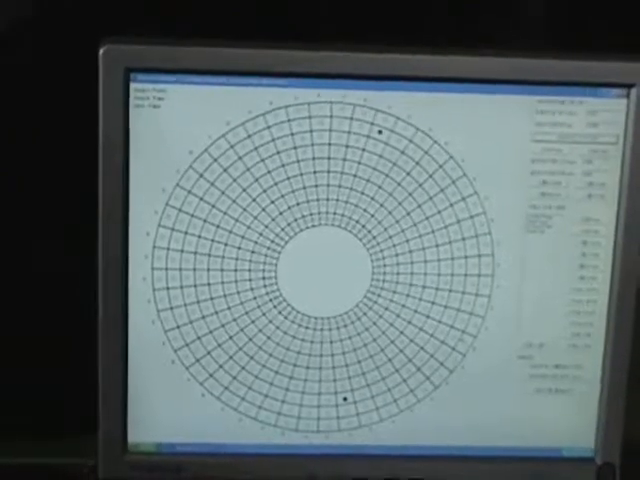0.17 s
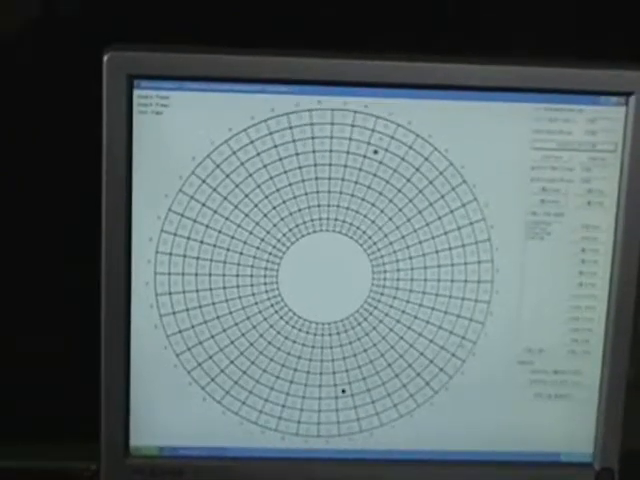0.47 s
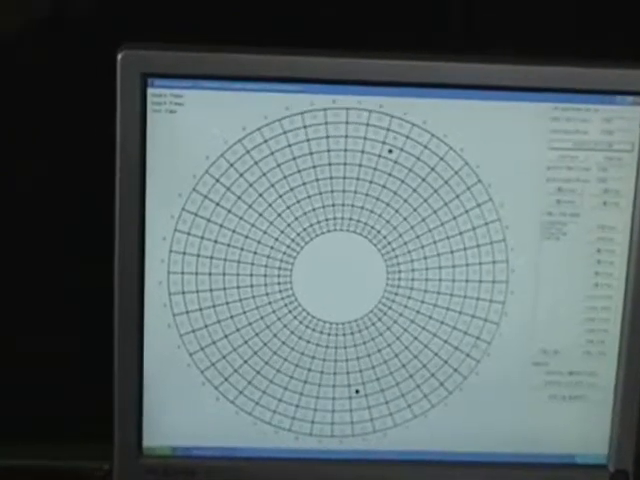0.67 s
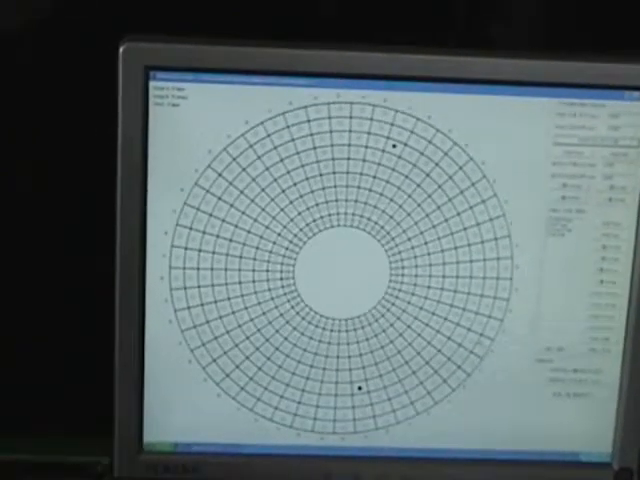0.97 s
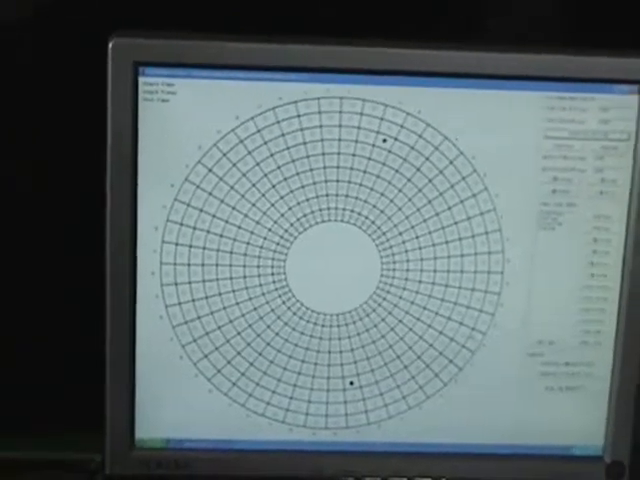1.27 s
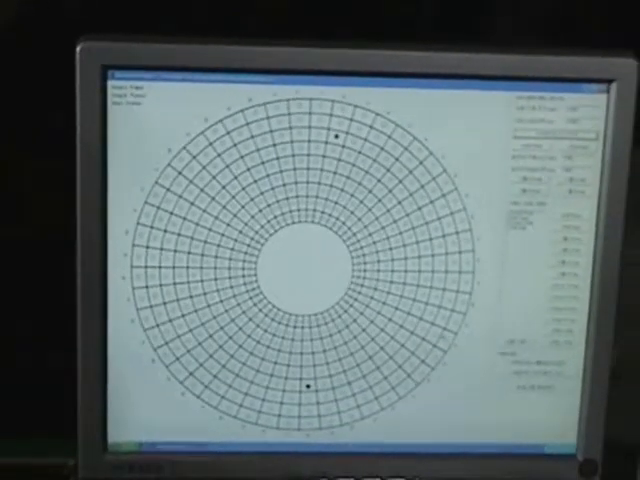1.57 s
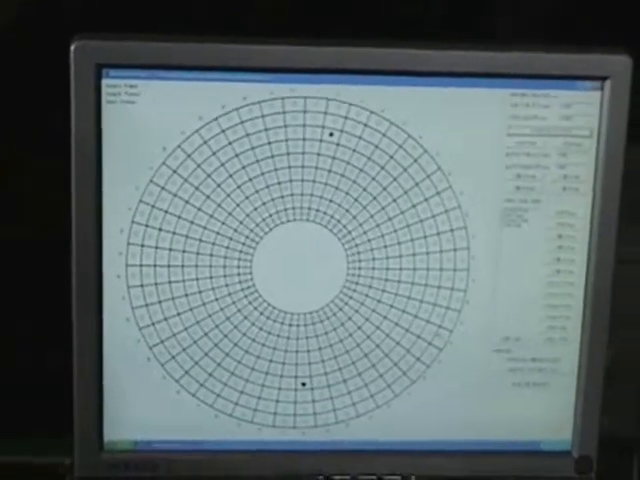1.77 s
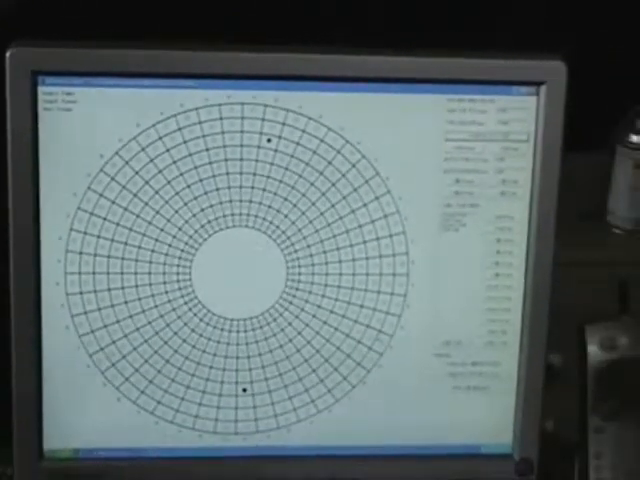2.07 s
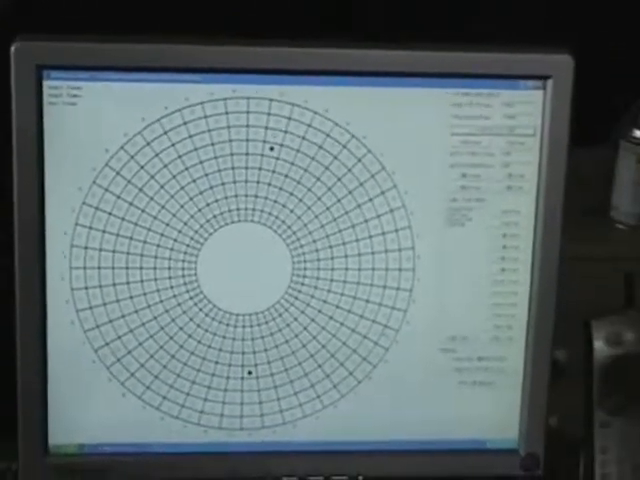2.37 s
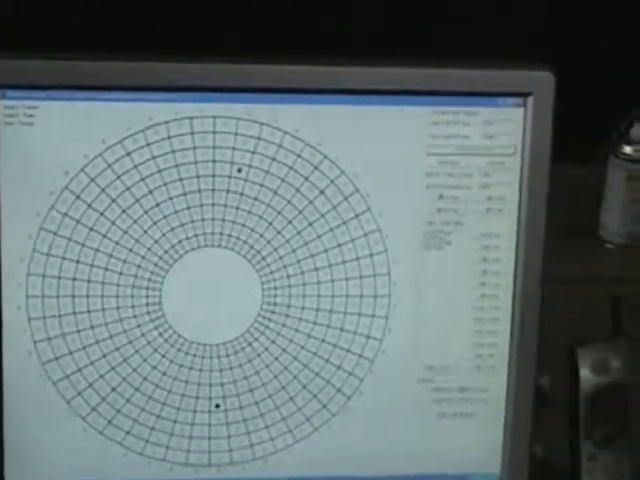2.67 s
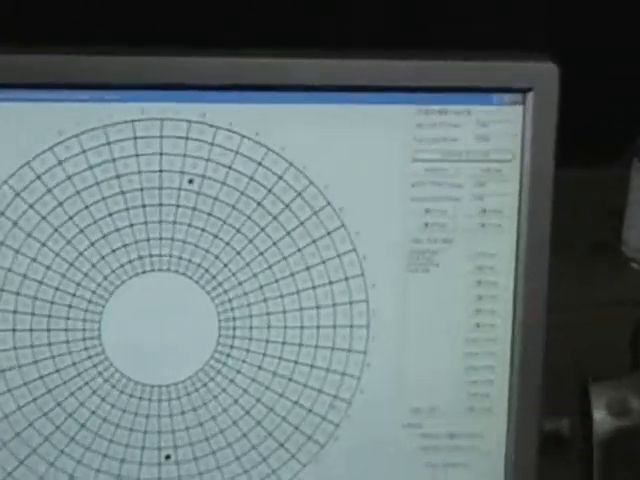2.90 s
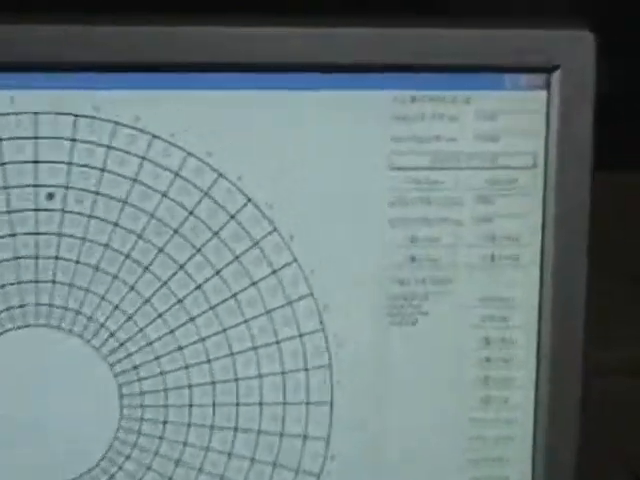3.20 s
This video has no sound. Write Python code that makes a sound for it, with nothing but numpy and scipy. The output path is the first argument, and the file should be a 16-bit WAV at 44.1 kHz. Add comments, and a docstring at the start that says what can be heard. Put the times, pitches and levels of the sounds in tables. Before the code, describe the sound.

Pneumatic machine in an indoor workshop: air bursts with dull valve thumps recur over a steady motor drone and whine, small metal clinks and rubbing slides between them; close stereo pickup, drone ducking under each burst.

```python
"""A pneumatic braiding machine in a workshop: a motor drones and whines and air leaks all the way through.
It starts inside a burst of air (filtered noise) with a valve thump (short, low decaying tones).
Thin whistles (narrow noise) come and go; at 0.6 s a part clinks (click and ringing tones), then slides (noise).
At 1.6 s comes the next burst with two thumps, at 2.3 s two clinks and a slide, at 3.3 s a thump and burst.
A fast gain control pushes the drone down under every burst."""
import sys
import numpy as np
from scipy import signal
from scipy.fft import rfft, irfft
from scipy.io import wavfile
from scipy.ndimage import uniform_filter1d

SR = 44100
rng = np.random.default_rng(int(sys.argv[2]) if len(sys.argv) > 2 else 0)


def unload_wav(signal):
    """Save mono or channel-first audio to the path in sys.argv[1] as 16-bit WAV at rate SR, clipped to [-1, 1]."""
    wavfile.write(
        sys.argv[1],
        SR,
        np.round(np.clip(np.atleast_2d(signal).T, -1, 1) * 32767).astype(np.int16),
    )


N = 147294


def amp(db):
    """Turn decibels into a plain gain."""
    return 10 ** (np.asarray(db) / 20)


def unit(x):
    """Scale a signal to an average (RMS) size of one."""
    return x / np.sqrt(np.mean(x ** 2) + 1e-20)


def read(points, hz):
    """Read a curve between its points, along a logarithmic pitch scale."""
    f, value = np.transpose(points)
    return np.interp(np.log(hz + 1), np.log(f + 1), value)


def clock():
    """Time of every sample in seconds."""
    return np.arange(N) / SR


def wander(rate_hz):
    """Smooth random motion of unit size; a higher rate moves faster."""
    f = np.fft.rfftfreq(N, 1 / SR)
    smooth = rfft(rng.standard_normal(N)) * np.exp(-(f / rate_hz) ** 2)
    return unit(irfft(smooth, N))


# How much louder the left channel is than the right: pitch_hz, difference_db
LEFT_LEAN = [(40, -2), (150, 3.5), (600, 3.5), (1300, 3.5), (2800, .4), (15000, 0)]


def lean(hz):
    """Left and right gains at a frequency."""
    difference_db = read(LEFT_LEAN, hz)
    return amp(np.array([difference_db, -difference_db]) / 2)


# How alike the two channels are: pitch_hz, likeness (0 to 1, anything above counts as 1)
LIKENESS = [(40, 1.5), (130, 0.6), (600, 1), (1400, 1), (3100, 0.77), (6000, 0.56), (15000, 0.63)]
COMB_DB = 1.3  # size of the fixed fine colour above 2000 Hz, as from nearby reflections


def noise(spectrum, patch_db, peaks=()):
    """Stereo noise of unit size with a spectrum, resonances and small drifting patches."""
    frames, hz = N // 256 + 5, np.fft.rfftfreq(1024, 1 / SR)
    a, b, c, d, patches = rng.standard_normal((5, frames, len(hz)))
    patches = uniform_filter1d(patches, size=7, axis=0)  # smooth over time
    patches = unit(uniform_filter1d(patches, size=16, axis=1))  # smooth over pitch

    same = np.clip(read(LIKENESS, hz), 0, 1)
    left = a + 1j * b
    right = same * left + np.sqrt(1 - same ** 2) * (c + 1j * d)
    z = np.array([left, right]) * lean(hz)[:, None]

    comb = uniform_filter1d(rng.standard_normal((2, 1, len(hz))), size=2)
    comb = COMB_DB * unit(comb) * (hz > 2000)
    lift = sum(db / (1 + ((hz - f) / width) ** 2) for f, width, db in peaks)
    z = z * amp(read(spectrum, hz) + lift + comb + patch_db * patches)
    sound = signal.istft(z.swapaxes(-1, -2), nperseg=1024, noverlap=768)[1]
    return unit(sound[:, :N])


def strike(start, t60, rise_s=0.00043):
    """Envelope of a blow: quick rise, exponential decay by 60 dB in t60 seconds."""
    age = np.maximum(clock() - start, 0)
    return np.minimum(age / rise_s, 1) * np.exp(-np.log(1000) * age / t60)


# Colour of the steady air leak: pitch_hz, relative_level_db
LEAK_COLOUR = [(50, -43), (300, -28), (1500, -8), (3000, 0), (4500, -1.5), (6300, -2), (8200, 1),
               (9700, -2), (11200, -0.5), (13300, -4.5), (16000, -7)]
# Broad resonances of the leak: pitch_hz, half_width_hz, lift_db
LEAK_RESONANCES = [(5300, 500, 1), (11050, 300, 1.5), (14300, 280, 7)]
# Thin air whistles: start_s, end_s, pitch_hz, level_db
AIR_WHISTLES = [(.1, 1.58, 8160, -55.5), (.78, 1.28, 5330, -59.5), (2.05, 3.26, 8150, -55),
                (2.34, 2.98, 5405, -55)]
LEAK_DB, LEAK_PATCH_DB = -40, 1.0
SPIT_S, SPIT_DB, SPIT_T60_S = 2.963, -43, .05  # one tiny spit of air
WHISTLE_FADE_S, WHISTLE_WANDER_HZ, WHISTLE_WAVER_DB = .06, 60, 1


def leak():
    """Escaping air makes steady noise; narrow noise around one pitch makes each breathy whistle."""
    t = clock()
    level = amp(LEAK_DB) + amp(SPIT_DB) * strike(SPIT_S, SPIT_T60_S)
    out = level * noise(LEAK_COLOUR, LEAK_PATCH_DB, LEAK_RESONANCES)
    for start, end, hz, db in AIR_WHISTLES:
        gate = np.clip(np.minimum(t - start, end - t) / WHISTLE_FADE_S, 0, 1)
        angle = 2 * np.pi * hz * t
        # two random strengths blur the pure tone into a narrow band of breath
        breath = wander(WHISTLE_WANDER_HZ) * np.sin(angle) + wander(WHISTLE_WANDER_HZ) * np.cos(angle)
        out += amp(db + WHISTLE_WAVER_DB * wander(7.4)) * gate * breath
    return out


# Strong partials of the motor: multiple_of_shaft_speed, level_db
STRONG_PARTIALS = [(6, -72), (10, -68.5), (11, -60.5), (12, -65.5), (16, -60), (17, -64.5), (18, -57.5),
                   (19, -53), (22, -54.5), (23, -58), (24, -53.5), (25, -67), (29, -51.5), (31, -57),
                   (36, -56.5), (37, -59), (39, -59), (41, -52.5), (46, -56), (48, -57.5), (51, -52.5),
                   (52, -58.5), (62, -60), (71, -58.5), (72, -55), (76, -61), (77, -56), (80, -46),
                   (82, -57), (84, -51), (85, -53), (86, -61), (99, -61), (108, -61)]
# Typical level of the weaker partials between them: pitch_hz, level_db
WEAK_PARTIALS = [(60, -88), (120, -77), (150, -84), (240, -76), (420, -72), (600, -64.5), (900, -66.5),
                 (1400, -60.5), (1750, -77.5), (2300, -72.5), (2800, -69), (3250, -82), (3850, -68),
                 (4200, -92)]
# Colour of the mechanical rush: pitch_hz, relative_level_db
RUSH_COLOUR = [(25, -38), (58, -38), (90, -28), (150, -19.5), (220, -14.5), (310, -20.5), (450, -8.5),
               (570, 1), (680, 2.5), (800, -2), (950, -7.5), (1090, -3.5), (1280, -3.5), (1520, -8),
               (1800, -9.5), (2500, -4.5), (4000, -35), (16000, -53)]
MOTOR_HZ, MOTOR_DRIFT = 30.42, .0004  # shaft turns per second, drift as a share of that
PARTIAL_SCATTER_DB, PARTIAL_WAVER_DB = 2, 1.6
PARTIAL_SPREAD = 0.27  # phase difference between the channels, radians per kHz
# below this pitch the partials nearly line up into one knock a turn (scatter in radians)
KNOCK_TOP_HZ, KNOCK_LOOSE_RAD = 500, 0.83
RUSH_DB, RUSH_THROB_DB, RUSH_PATCH_DB = -42, 1, 2.04


def motor():
    """A turning shaft gives a comb of partials, with a soft knock and a throb of the rush once a turn."""
    angle = 2 * np.pi * np.cumsum(MOTOR_HZ * (1 + MOTOR_DRIFT * wander(3.0))) / SR
    strong = {round(k): db for k, db in STRONG_PARTIALS}
    waver = wander(3.8)
    out = np.zeros((2, N))
    for k in range(3, 132):
        hz = k * MOTOR_HZ
        scatter, spread, loose = rng.standard_normal(3)
        phase = loose * (KNOCK_LOOSE_RAD if hz < KNOCK_TOP_HZ else np.pi)
        weak_db = read(WEAK_PARTIALS, hz) + PARTIAL_SCATTER_DB * np.tanh(scatter)
        db = strong.get(k, weak_db)
        offset = np.array([[0], [PARTIAL_SPREAD * spread * hz / 1000]])
        own_waver = np.roll(waver, rng.integers(N))  # each partial wavers at its own time
        size = np.sqrt(2) * amp(db + PARTIAL_WAVER_DB * own_waver)
        out += lean(hz)[:, None] * size * np.sin(k * angle + phase + offset)
    rush_level = amp(RUSH_DB + RUSH_THROB_DB * np.cos(angle))
    return out + rush_level * noise(RUSH_COLOUR, RUSH_PATCH_DB)


# The whine gently rises and falls, before its quick waver: time_s, level_db
WHINE_LEVELS = [(0, -42), (.45, -43.5), (.7, -42), (1.5, -42), (2.05, -43), (2.35, -42), (3.3, -41.5)]
WHINE_HZ, WHINE_DRIFT = 1054, 0.00075  # drift as a share of the pitch
WHINE_WAVER_DB, WHINE_FLUTTER_RAD = 1.13, 0.085


def whine():
    """The drive gives one strong tone whose pitch and level flutter slightly."""
    angle = 2 * np.pi * np.cumsum(WHINE_HZ * (1 + WHINE_DRIFT * wander(12.0))) / SR
    level_db = np.interp(clock(), *np.transpose(WHINE_LEVELS)) + WHINE_WAVER_DB * wander(34)
    tone = np.sin(angle + WHINE_FLUTTER_RAD * wander(47)) * amp(level_db)
    return np.sqrt(2) * lean(WHINE_HZ)[:, None] * tone


# Times when a part slides after a clink: start_s, end_s, level_db of the rubbing
SLIDE_TIMES = [(0.624, 1.33, -43), (2.29, 3.002, -44.5)]
# Colour of the rubbing: pitch_hz, relative_level_db
SLIDE_COLOUR = [(60, -28), (400, -10), (700, 3), (900, -4), (1120, -1.5), (1450, -6), (1800, -12),
                (3200, -4), (4500, -16.5), (14000, -15.5)]
SLIDE_FADE_S, SLIDE_PATCH_DB = 0.0087, -0.5
SING_HZ, SING_DB, SING_WAVER_HZ = 1084, -2, 14  # tone of the part; its level is against the rubbing


def slides():
    """A travelling part rubs with soft, grainy noise; it sings faintly and beats against the whine."""
    t = clock()
    level = sum(amp(db) * np.clip(np.minimum(t - start, end - t) / SLIDE_FADE_S, 0, 1)
                for start, end, db in SLIDE_TIMES)
    tone = np.sin(2 * np.pi * SING_HZ * t + wander(SING_WAVER_HZ))
    sing = lean(SING_HZ)[:, None] * amp(SING_DB) * tone
    return level * (noise(SLIDE_COLOUR, SLIDE_PATCH_DB) + sing)


# Metal clinks: start_s, base_level_db, click_pitch_hz, click_overtone_db
CLINK_EVENTS = [(.597, -37, 3120, -14), (2.2753, -37, 2870, -10), (2.339, -49, 2750, -12)]
# Ringing tones of the part: pitch_hz, level_db against the base, t60_s
CLINK_TONES = [(2800, -6, .14), (3020, -2, .17), (3230, -3, .2), (3520, -10, .16), (4540, -11, .1),
               (5850, -11, .09)]
# Colour of the grit in the click: pitch_hz, relative_level_db
CLICK_COLOUR = [(500, -33), (2000, -5), (3000, 0), (4500, -1), (5900, -6), (7500, -10), (16000, -24)]
CLICK_DB, CLICK_S, GRIT_DB = 9.5, .002, -5  # click against the base, time constant, grit in the click


def clinks():
    """A small steel part scrapes home with a sharp click, then rings briefly in several decaying tones."""
    t = clock()
    grit = noise(CLICK_COLOUR, 0)
    out = np.zeros((2, N))
    for start, db, click_hz, overtone_db in CLINK_EVENTS:
        angle = 2 * np.pi * click_hz * (t - start)
        click = np.cos(angle) + amp(overtone_db) * np.cos(2 * angle) + amp(GRIT_DB) * grit
        # the click swells into its start time and fades just as fast
        out += amp(db + CLICK_DB) * np.exp(-abs(t - start) / CLICK_S) * click
        for hz, tone_db, t60 in CLINK_TONES:
            phase = rng.uniform(0, 2 * np.pi) + .5 * rng.standard_normal((2, 1)) + 0.68 * wander(90)
            out += amp(db + tone_db) * strike(start, t60) * np.sin(2 * np.pi * hz * t + phase)
    return out


# Valve thumps: start_s, base_level_db
THUMP_EVENTS = [(0.031, -31), (1.588, -35), (1.712, -36), (3.2659, -35)]
# Tones of the machine body that they shake: pitch_hz, level_db against the base, t60_s
BODY_TONES = [(173, -3, 0.045), (260, 0.5, 0.012), (375, 0, 0.049), (564, -22, 0.09)]
# Colour of the puff of air with each thump: pitch_hz, relative_level_db
PUFF_COLOUR = [(30, -10), (100, -7), (200, 2), (400, -4), (900, -16), (3000, -40)]
THUMP_LOW_HZ = 90  # the body gives out little below this
PUFF_DB, PUFF_RISE_S, PUFF_T60_S = -5, 0.0022, 0.11  # puff level is against the base


def thumps():
    """Valves knock dull, short tones out of the machine's body, each blurred by a low puff of air."""
    t = clock()
    knocks, puffs = np.zeros((2, N)), np.zeros(N)
    for start, db in THUMP_EVENTS:
        for hz, tone_db, t60 in BODY_TONES:
            tone = strike(start, t60) * np.cos(2 * np.pi * hz * (t - start))
            knocks += lean(hz)[:, None] * amp(db + tone_db) * tone
        puffs += amp(db + PUFF_DB) * strike(start, PUFF_T60_S, rise_s=PUFF_RISE_S)
    low_cut = signal.butter(2, THUMP_LOW_HZ, "high", fs=SR, output="sos")
    return signal.sosfilt(low_cut, knocks) + puffs * noise(PUFF_COLOUR, 0)


# Air bursts: start_s (below zero: already under way), level_db before the sag
BURST_EVENTS = [(-.095, -11), (1.584, -15.5), (3.263, -17.5)]
# Colour of the jet at full pressure: pitch_hz, relative_level_db
FULL_JET_COLOUR = [(30, -33), (200, -14), (600, -8), (1400, -14), (2400, 3), (3400, -0.5), (5700, -3.5),
                   (7000, -1.5), (8400, -0.5), (11000, -2), (16000, -0.5)]
# Colour of the jet as it runs out: pitch_hz, relative_level_db
LOW_JET_COLOUR = [(30, -29), (200, -48), (600, -11.5), (1400, -7.5), (2400, -2), (4000, 0), (5700, -2.5),
                  (8000, -3), (11000, -9), (16000, -10.5)]
# Resonances of the exhaust port: pitch_hz, half_width_hz, lift_db
PORT_RESONANCES = [(3250, 250, 1.5), (4700, 280, 2.8)]
ATTACK_S, OPEN_S, SAG_DB_PER_S, RELEASE_DB_PER_S = 0.016, 0.21, 26, 109.5
DARKEN_S, JET_PATCH_DB = .27, 0.76
LINGER_DB, LINGER_DB_PER_S = 11, 52.5  # bright hiss left in the hall: dB under the burst, fall


def exhaust():
    """A jet opens abruptly, sags while the valve is open, then darkens and dies into a lingering hiss."""
    full = noise(FULL_JET_COLOUR, JET_PATCH_DB, PORT_RESONANCES)
    low = noise(LOW_JET_COLOUR, JET_PATCH_DB, PORT_RESONANCES)
    hall = noise(FULL_JET_COLOUR, JET_PATCH_DB, PORT_RESONANCES)
    out = np.zeros((2, N))
    for start, db in BURST_EVENTS:
        age = np.maximum(clock() - start, 0)
        sag_db = SAG_DB_PER_S * np.minimum(age, OPEN_S)
        release_db = RELEASE_DB_PER_S * np.maximum(age - OPEN_S, 0)
        dark = np.minimum(age / DARKEN_S, 1)  # cross-fades from the full to the low jet
        jet = amp(-sag_db - release_db) * (np.sqrt(1 - dark) * full + np.sqrt(dark) * low)
        linger = amp(-LINGER_DB - LINGER_DB_PER_S * age) * hall
        out += amp(db) * np.minimum(age / ATTACK_S, 1) * (jet + linger)
    return out


def scene():
    """Add up all the sources, from the background to the bursts."""
    return leak() + motor() + whine() + slides() + clinks() + thumps() + exhaust()


LIMIT_DB, LIMIT_SHARE = -29, 0.9  # this share of any level above the limit is taken away
RECOVER_DB_PER_S, DETECT_S, LOOK_AHEAD_S = 78, 0.002, 0.002
EDGE_HZ = 15770  # top of the sound band


def record(dry):
    """Fast gain control holds the bursts down and recovers steadily; then the treble is cut off."""
    power = (dry ** 2).mean(0)
    keep = np.exp(-1 / (DETECT_S * SR))
    smooth = signal.lfilter([1 - keep], [1, -keep], power, zi=[power[:256].mean()])[0]
    # hold each peak, then let it fall at a steady rate
    fall_db = RECOVER_DB_PER_S * clock()
    held_db = np.maximum.accumulate(10 * np.log10(smooth + 1e-12) + fall_db) - fall_db
    held_db = np.interp(clock() + LOOK_AHEAD_S, clock(), held_db)
    ducked = dry * amp(-LIMIT_SHARE * np.maximum(held_db - LIMIT_DB, 0))
    treble_cut = signal.firwin(1501, EDGE_HZ, window=("kaiser", 9), fs=SR)
    return signal.oaconvolve(ducked, treble_cut[None], "same")


dry = scene()
out = record(dry)
unload_wav(out)
```